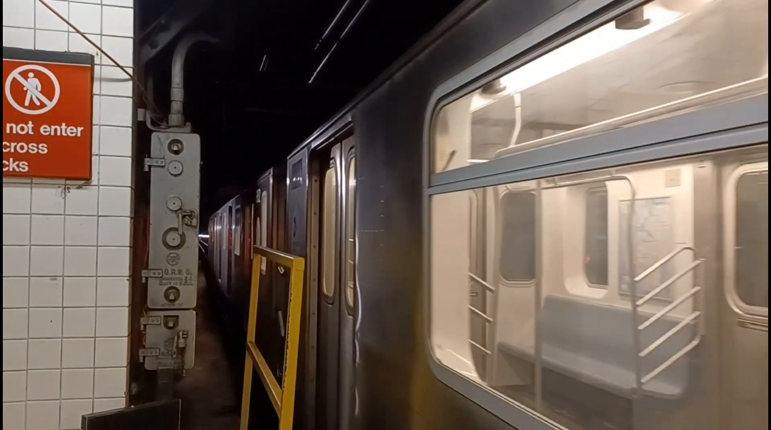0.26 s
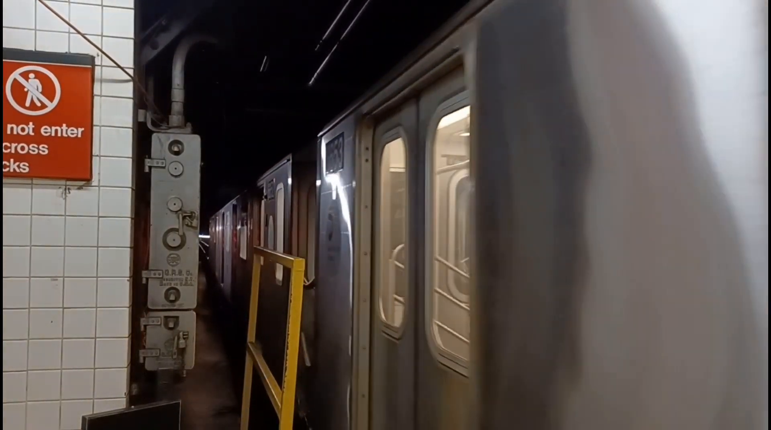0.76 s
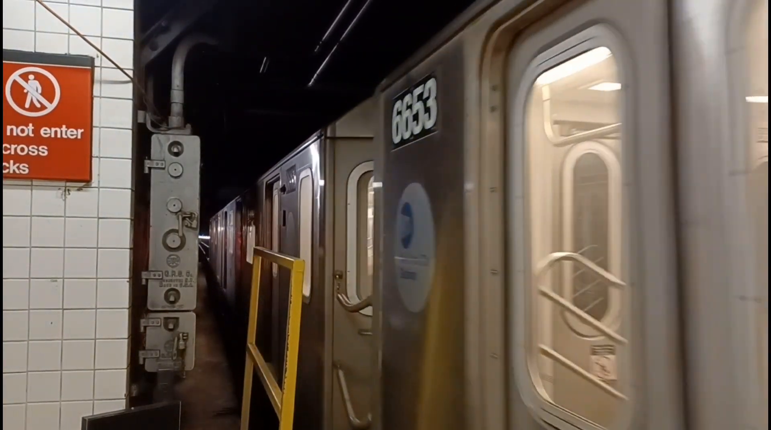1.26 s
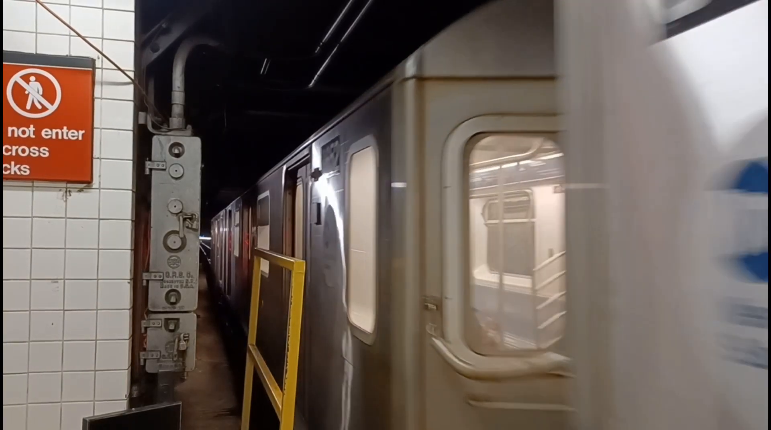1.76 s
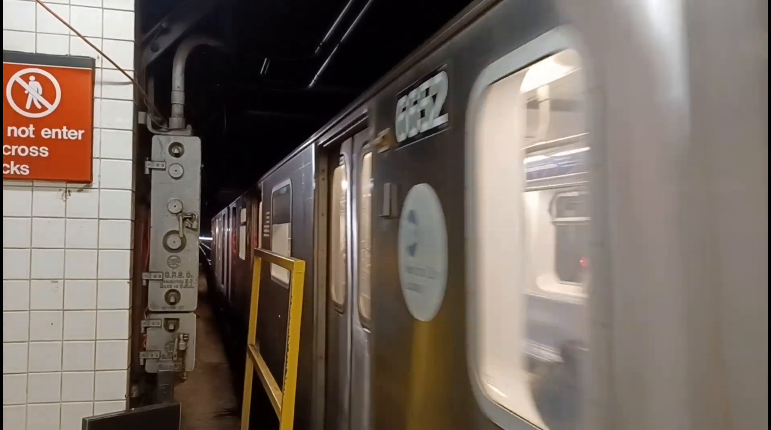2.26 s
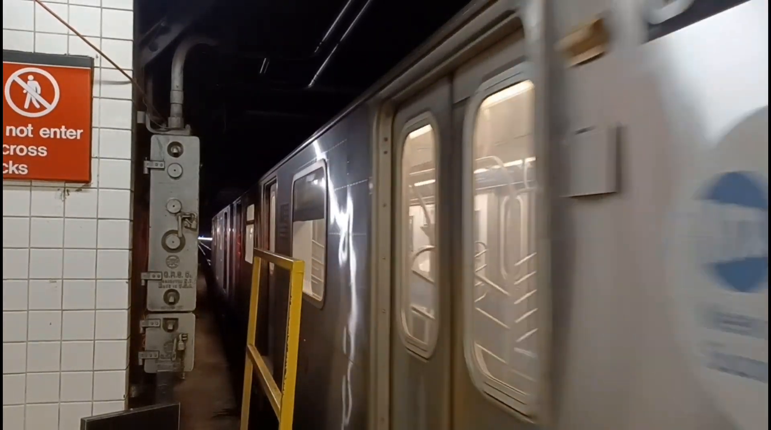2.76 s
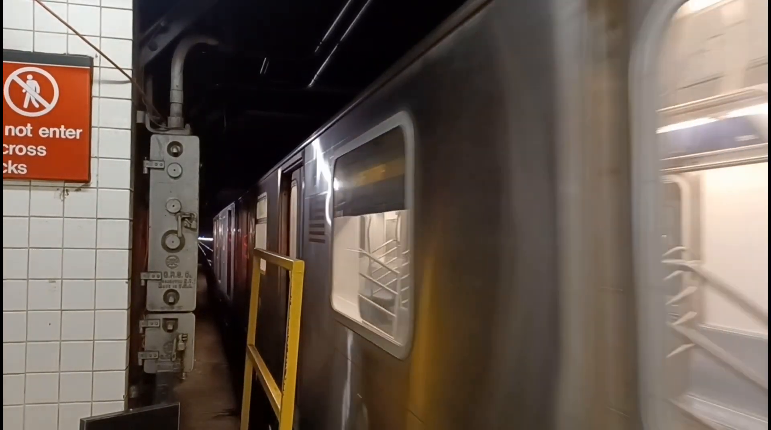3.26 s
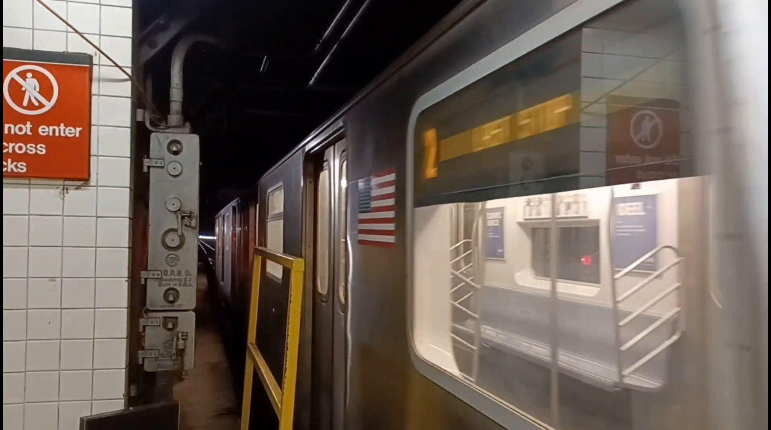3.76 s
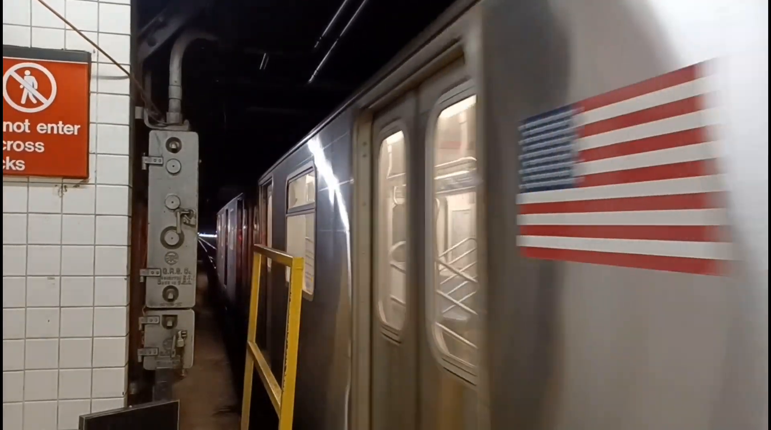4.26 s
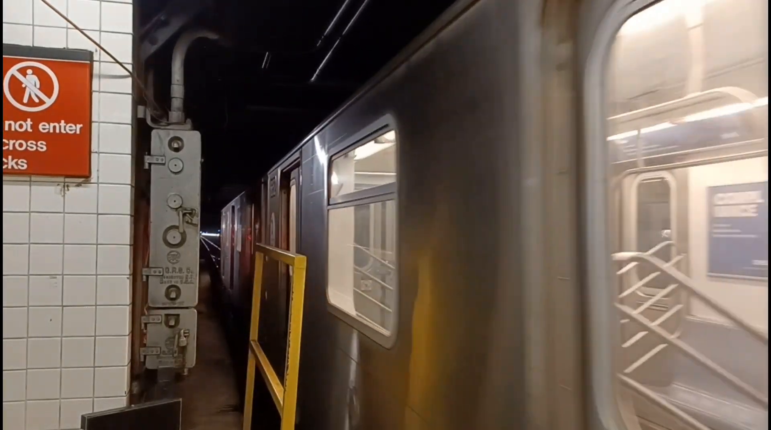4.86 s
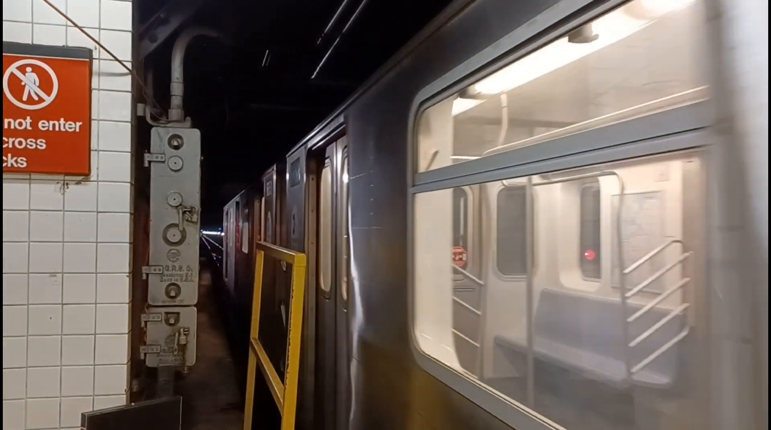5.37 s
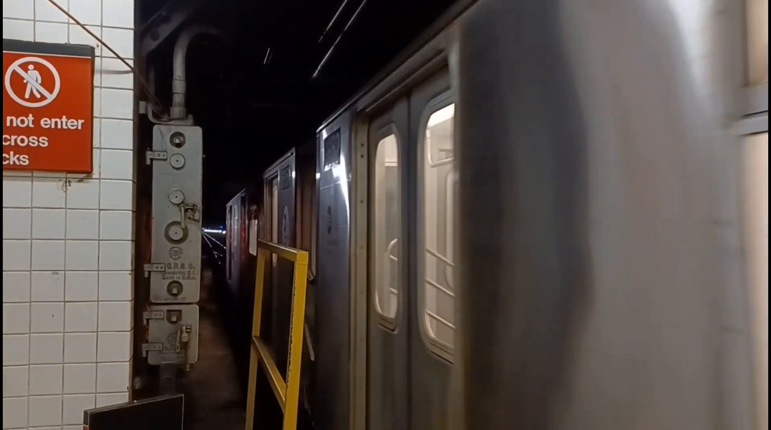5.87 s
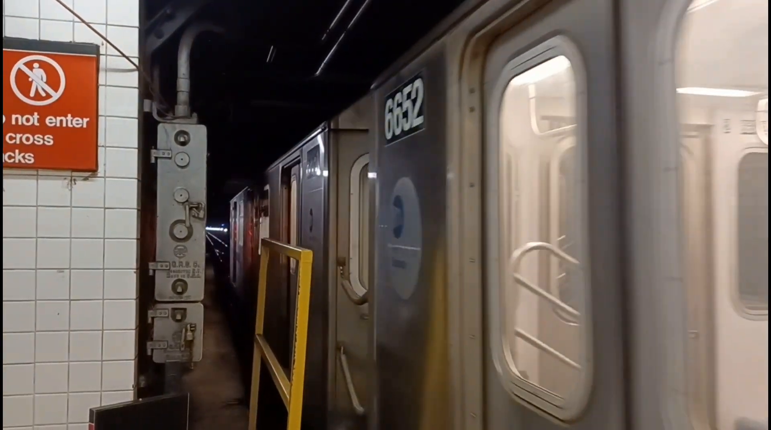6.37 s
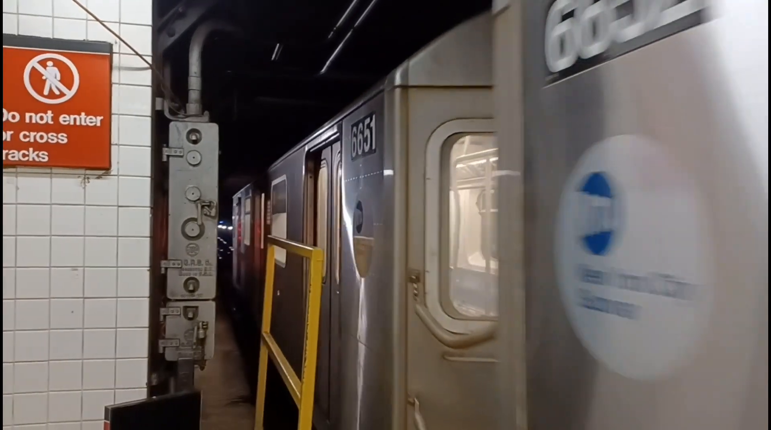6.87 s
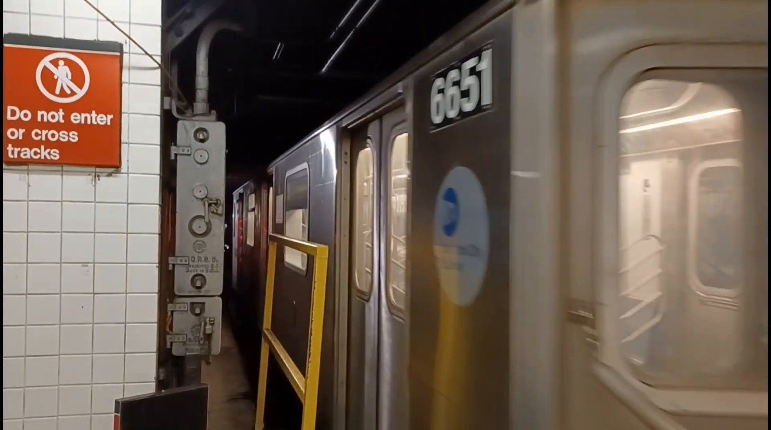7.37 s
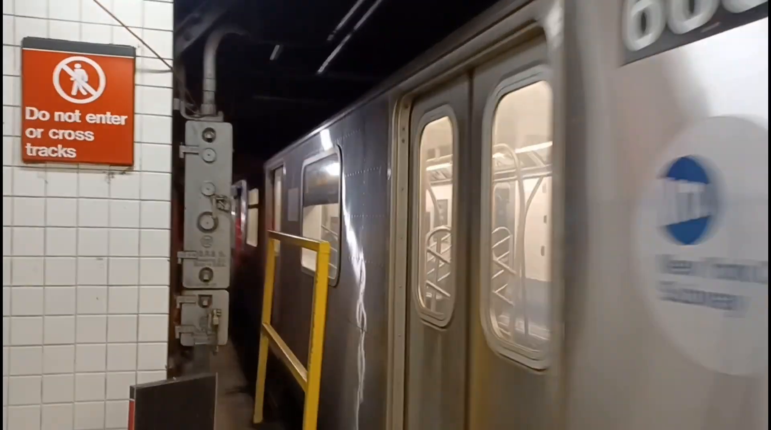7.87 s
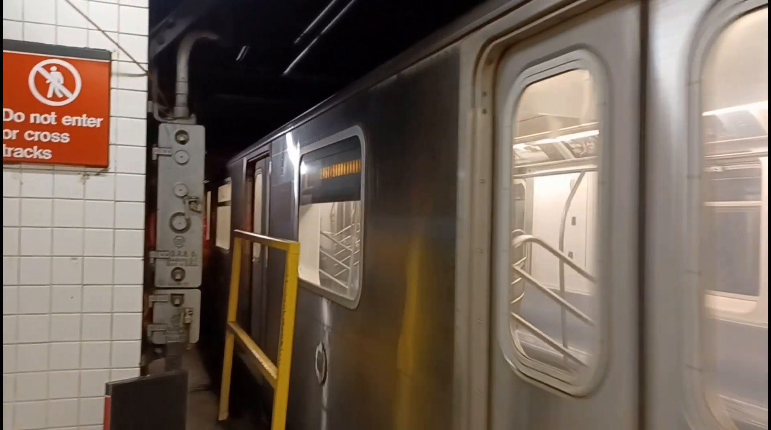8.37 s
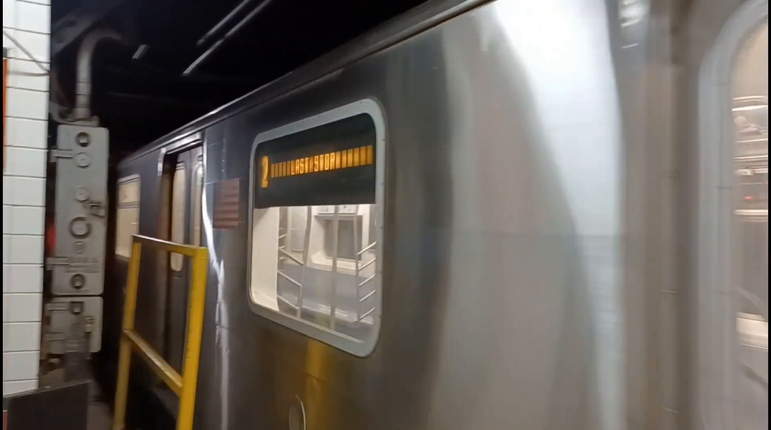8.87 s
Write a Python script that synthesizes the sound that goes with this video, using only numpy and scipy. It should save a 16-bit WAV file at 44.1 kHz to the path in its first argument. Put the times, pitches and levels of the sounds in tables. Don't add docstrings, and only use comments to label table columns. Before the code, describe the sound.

Close on an underground platform, a subway train passes at a slow steady pace. Hollow wheel knocks over rail joints come irregularly, sometimes doubled, each echoing for about a second. Under them run a rolling roar and low motor hum with a wavering gear whine. A high flange squeal sings at first, dies after two seconds, then only faint squeaks return. Thin air hiss throughout; wide stereo.

```python
import sys
import numpy as np
from scipy import signal
from scipy.fft import rfft, irfft, next_fast_len
from scipy.io import wavfile
from scipy.ndimage import uniform_filter1d

SR = 44100
rng = np.random.default_rng(int(sys.argv[2]) if len(sys.argv) > 2 else 0)


def int16_out(signal):
    q = np.round(np.clip(np.atleast_2d(signal).T, -1, 1) * 32767)
    wavfile.write(sys.argv[1], SR, q.astype(np.int16))


def volts(x):
    e = np.asarray(x, float) / 20
    return 10 ** e


N = 402633
HZ = np.fft.rfftfreq(next_fast_len(N + 8192, True), 1 / SR)

# t/s, level/dB, tilt/(dB per octave), tail factor/1, build-up/s
JOINTS = [(.002, -16, -3.5, 0.98, 0.0013), (0.854, -12, 2, 0.75, 0.0073), (1.08, -28, -5, 0.85, .03),
          (1.561, -13, 1.5, 0.97, 0.0088), (2.635, -20, 0.5, 0.71, 0.018), (3.32, -16, -0.5, 1., 0.022),
          (4.165, -17.5, 3, 0.63, 0.019), (4.448, -10.5, -0.5, 1.05, 0.0038), (4.83, -24, 3, 0.86, 0.032),
          (5.136, -16.5, 0, 1, 0.015), (5.19, -17, 0.5, 0.89, 0.014), (6.03, -14, -0.5, 0.92, 0.0035),
          (6.099, -20.5, 1.5, 0.58, 0.003), (6.797, -13, 0.5, 0.78, 0.0071), (6.85, -11.5, -2, 0.68, 0.016),
          (8.158, -25.5, 3.5, 1.23, 0.021), (9.1, -21, -0.5, 1., .01)]
# t/s, level/dB
AIR = [(0, -35.5), (.025, -45), (.8, -44.5), (1.6, -45), (2.3, -44.5), (2.75, -47.5), (3.28, -42.5),
       (4.4, -44), (5.2, -46), (6, -45.5), (7, -44.5), (8.1, -46), (8.57, -41.5), (9.13, -42)]


def evened(x):
    return x / np.sqrt(np.mean(x ** 2) + 1e-20)


def read(points, hz):
    f, value = np.transpose(points)
    return np.interp(np.log(hz + 1), np.log(f + 1), value)


def follow(rows, t):
    s, *columns = np.transpose(rows)
    return [np.interp(t, s, column) for column in columns]


def play(rows):
    return follow(rows, np.arange(rows[0][0], rows[-1][0], 1 / SR))


def bumps(rows, t):
    return sum(db * np.exp(-((t - s) / length) ** 2) for s, db, length in rows)


def add(mix, s, sound):
    part = mix[:, round(s * SR):][:, :sound.shape[1]]
    part += sound[:, :part.shape[1]]


def unit_band(db, lo_hz, hi_hz, hz):
    band = db[(hz > lo_hz) & (hz < hi_hz)]
    return db - 10 * np.log10(np.sum(volts(band) ** 2) / len(hz))


def field(level_db, size, patchy_db):
    a, b, c, d, patches = rng.standard_normal((5,) + level_db.shape)
    patches = uniform_filter1d(patches, size=30, axis=0)
    patches = evened(uniform_filter1d(patches, size=size // 256 + 1, axis=1))
    z = np.array([a + 1j * b, c + 1j * d]) * volts(level_db + patchy_db * patches)
    x = signal.istft(z.transpose(0, 2, 1), nperseg=size, noverlap=size * 3 // 4)[1][:, :N]
    return x * np.sqrt(3 / size)


def whistle(hz, db, width, steady):
    r = np.exp(-np.pi * width / SR)
    shape = (2, len(db) + 4000)
    slow = rng.standard_normal(shape) + 1j * rng.standard_normal(shape)
    slow = signal.lfilter([1], [1, -2 * r, r * r], slow)[:, 4000:]
    slow = slow / abs(slow) ** np.clip(steady, 0, 1)
    phase = 2 * np.pi * np.cumsum(hz * np.ones(len(db))) / SR
    return volts(db) * evened((slow * np.exp(1j * phase)).real)


def ducking(t):
    from_db, share, recover_s = -19.5, 0.48, 1
    s, db = np.transpose(JOINTS)[:2, :, None]
    drop_db = share * np.maximum(db - from_db, 0)
    return -np.max(drop_db * (t > s) * np.exp(-abs(t - s) / recover_s), axis=0)


def spaced_pair(x, colour=1.):
    # f/Hz, coherence/1
    likeness = [(60, 1), (300, 0.94), (450, 0.76), (600, 0.34), (780, 0.63), (1000, 0.2), (1200, 0)]
    # f/Hz, level/dB
    balance = [(60, -1.0), (130, -1.0), (290, 0.0), (640, 0.0), (1400, -1.3), (2500, -3.0), (6770, 0.0),
               (14900, 2.0)]
    one, other = rfft(x, 2 * len(HZ) - 2) * colour
    turn = 2 * np.pi * HZ * .00062 - 3.3
    along = .15 * np.exp(-1j * turn) + .06 * np.exp(1j * turn)
    along = along * np.clip(HZ / 1300, 0, 1) ** 4 * volts(-HZ / 900)
    same = np.clip(read(likeness, HZ), 0, .995) * (1 - abs(along)) + along
    right = same * one + np.sqrt(np.maximum(1 - abs(same) ** 2, 0)) * other
    lean = volts(read(balance, HZ) / 2)
    return irfft(np.array([one * lean, right / lean]))[:, :N]


def joints():
    # f/Hz, density/(dB per Hz)
    knock = [(70, -38), (120, -37), (180, -16), (300, -3.5), (530, -12), (930, -16), (1380, -27.5),
             (2000, -26.5), (3000, -34.5), (5000, -40.5), (7500, -59), (12000, -100)]
    # f/Hz, t60/s
    tunnel = [(150, 1), (350, 1), (900, 0.97), (2000, 0.95), (5000, 0.44)]
    hz, t = np.fft.rfftfreq(256, 1 / SR), np.arange(N // 64 + 5) * 64 / SR
    power = np.full((len(t), len(hz)), 1e-14)
    for s, db, tilt_db, tail, rise in JOINTS:
        age = t[(t >= s) & (t < s + 1)][:, None] - s
        colour_db = tilt_db * np.log2((hz + 50) / 400)
        decay_db = 60 * age / (tail * read(tunnel, hz + 50))
        shape = (1 - np.exp(-age / rise)) * volts(db + colour_db - decay_db)
        first = np.searchsorted(t, s)
        power[first:first + len(age)] += shape ** 2
    colour = volts(unit_band(read(knock, HZ), 150, 1500, HZ))
    return spaced_pair(field(10 * np.log10(power), size=256, patchy_db=1.42), colour)


def rings():
    # t/s, f/Hz, level/dB
    body_rings = [(.002, 285, -16), (4.17, 274.6, -22), (5.16, 206, -17), (.87, 263.6, -9.5),
                  (.856, 738, -17), (1.565, 309, -19.5), (3.326, 461, -23.5), (4.453, 281.6, -18),
                  (4.454, 484, -22), (5.146, 285.5, -11.5), (5.19, 1590, -30), (5.215, 309, -14.5),
                  (6.033, 754, -20.5), (6.035, 273, -16), (6.07, 275, -14), (6.803, 930, -23),
                  (6.81, 337, -17.5), (6.82, 206, -19), (8.165, 289.5, -20.5)]
    # f/Hz, level/dB, t60/s, blur/Hz
    tread_modes = [(1868, 0, .8, 22), (3230, -10, .6, 40), (4980, -14, .44, 55)]
    # f/Hz, level/dB, t60/s, blur/Hz
    flange_modes = [(2480, 0, .5, 45), (4180, -9, .42, 80)]
    # t/s, tread level/dB, flange level/dB
    wheel_hits = [
        (.858, -25, -32),
        (1.57, -33, -38),
        (3.33, -40, -50),
        (4.455, -32, -38),
        (5.19, -42, -40),
        (6.035, -40, -30.5),
        (6.807, -35, -32),
    ]
    body_t60_s = 0.44
    struck = [(s, hz, db, body_t60_s, 22 + 0.039 * hz) for s, hz, db in body_rings]
    for s, tread_db, flange_db in wheel_hits:
        struck += [(s, hz, tread_db + db, t60, width) for hz, db, t60, width in tread_modes]
        struck += [(s, hz, flange_db + db, t60, width) for hz, db, t60, width in flange_modes]
    out, age = np.zeros((2, N)), np.arange(SR // 2) / SR
    for s, hz, db, t60, width in struck:
        rise = 1 - np.exp(-age * hz / 1.1)
        add(out, s, rise * whistle(hz, db - 60 * age / t60, width, steady=.8))
    return out


def rolling():
    # t/s, level/dB
    roll = [(0.0, -21), (0.25, -29.5), (0.86, -27), (1.04, -21.5), (1.25, -24.5), (2.54, -29), (3.36, -23),
            (4.22, -26), (4.52, -24), (4.75, -27.5), (6.58, -29.5), (6.99, -24.5), (7.37, -27),
            (7.98, -29.5), (8.26, -28), (9.13, -26)]
    # f/Hz, density/(dB per Hz)
    roar = [(15, -88), (30, -64), (55, -27.5), (85, -16.5), (125, -13.5), (200, -10.5), (290, -9.5),
            (480, -20), (990, -25), (1350, -29), (2900, -29.5), (5200, -36.5), (7500, -60), (10000, -55)]
    zones_hz = [75, 280, 800, 3500]
    # f/Hz, width/Hz, level/dB
    wheel_modes = [
        (3260, 145, 4),
        (4150, 120, 1),
        (5020, 230, 2.5),
    ]
    # t/s, lift/dB, length/s
    thuds = [(.28, -6, .1), (0.762, -1, 0.074), (1.16, 14.5, 0.12), (1.6, 5.5, 0.17), (2.71, 10.5, 0.11),
             (3.15, 3.5, 0.16), (4.06, 2, 0.088), (4.47, 10.5, 0.12), (6.847, 2, .1), (7.195, 1, 0.044),
             (7.7, -2, 0.33), (2.95, 3, 0.11), (8.389, 5, .07), (8.77, 5, 0.15)]
    # t/s, lift/dB, length/s
    scrapes = [
        (.6, 1.5, 0.24),
        (3.36, .6, .08),
        (5.25, -1.5, .08),
        (6.75, 1, .1),
        (8.3, 4, 0.11),
    ]
    force_share = [0.61, 0.95, 1.03, 0.1]
    draught_share = [0.05, 0.05, 0.16, 0.66]
    thud_share = [0.97, 0.15, .05, .01]
    hz, t = np.fft.rfftfreq(1024, 1 / SR), np.arange(N // 256 + 5) * 256 / SR
    force = follow(roll, t)[0]
    draught = follow(AIR, t)[0] + ducking(t)
    zones = np.outer(force_share, force - np.median(force))
    zones += np.outer(thud_share, bumps(thuds, t))
    zones += np.outer(draught_share, draught - np.median(draught))
    zones[3] += bumps(scrapes, t)
    place = np.interp(np.log(hz + 1), np.log(zones_hz), np.arange(4))
    share = np.maximum(1 - abs(place - np.arange(4)[:, None]), 0)
    colour_db = unit_band(read(roar, HZ), 450, 1300., HZ) - 35.5
    for mode_hz, width, db in wheel_modes:
        colour_db += db / (1 + ((HZ - mode_hz) / width * 2) ** 2)
    return spaced_pair(field(zones.T @ share, size=1024, patchy_db=1.63), volts(colour_db))


def squeal(out):
    # t/s, level/dB
    loudness = [(0, -34.5), (.4, -32), (.6, -34), (1.05, -33), (1.2, -37), (1.72, -31.5), (1.85, -36.5),
                (2.05, -42), (2.3, -59)]
    # f/Hz, level/dB, blur/Hz
    partials = [
        (2568, .5, 70),
        (3860, -21, 70),
        (5150, -15, 60),
    ]
    for hz, rel_db, width in partials:
        add(out, 0, whistle(hz, play(loudness)[0] + rel_db, width, steady=.45))


def squeaks(out):
    # start t/s, length/s, f/Hz, glide/Hz, level/dB
    slips = [
        (2.05, 0.23, 1710, -30, -41),
        (2.3, .45, 3300, 20, -45),
        (2.35, 0.31, 2960, -19, -44),
        (3.2, .2, 3740, 10, -44),
        (3.2, .22, 1190, 80, -37),
        (6.45, .4, 2830, 170, -42),
    ]
    for s, length, hz, glide_hz, db in slips:
        part = np.arange(0, 1, 1 / (length * SR))
        swell = np.sqrt(np.sin(np.pi * part))
        add(out, s, swell * whistle(hz + glide_hz * part, np.full(len(part), db), width=70, steady=.3))


def brake_whistle(out):
    # t/s, f/Hz, level/dB
    brake = [(1.721, 1228, -55), (1.8, 1192, -40), (1.9, 1246, -39), (2, 1208, -38), (2.08, 1200, -55)]
    add(out, brake[0][0], whistle(*play(brake), width=14, steady=0.56))


def motor_hum(out):
    # t/s, level/dB
    hum = [(0, -38), (.4, -36.5), (.85, -29), (1.45, -29), (1.8, -38), (2.3, -34), (3, -35), (3.3, -27),
           (4.2, -24), (4.6, -30.5), (5.3, -35), (6, -38.5), (6.4, -32), (7, -28), (7.6, -26.5),
           (8.3, -32.5), (9.13, -29)]
    # t/s, lift/dB, length/s
    in_step = [(.05, 4, .04), (.71, 4, .05), (1.43, 5, .06), (2.72, 8, 0.096), (3.71, 4, 0.043),
               (5, 10, .07), (5.62, 8, .04), (5.73, 9, 0.041), (6.28, 10, .04), (6.64, 4, .04),
               (7.22, -3, .06), (7.4, 3, 0.043), (7.73, -9, 0.054)]
    db = play(hum)[0] + bumps(in_step, np.arange(0, hum[-1][0], 1 / SR))
    add(out, 0, whistle(121.8, db, width=11, steady=.75))


def gear_whine(out):
    # t/s, f/Hz, level/dB
    gears = [(0, 1806, -39.5), (.7, 1770, -48), (1.6, 1800, -48), (1.95, 1760, -43), (2.17, 1700, -43),
             (2.4, 1660, -42.5), (2.7, 1638, -45), (3.1, 1670, -56), (4.3, 1700, -49), (5.1, 1712, -46),
             (5.9, 1696, -41), (6.55, 1639, -45), (7.1, 1716, -39), (7.8, 1650, -50), (8.6, 1678, -39.5),
             (9.13, 1666, -48)]
    mesh_hz, mesh_db = play(gears)
    lower = whistle(mesh_hz, mesh_db, width=160, steady=0)
    upper = whistle(mesh_hz * 1.76, mesh_db - 3.5, width=110, steady=0)
    add(out, 0, lower + upper)


def drones(out):
    # t/s, f/Hz, level/dB
    lines = [
        [(2.9, 286, -33.5), (3.1, 288.4, -29.5), (3.5, 287, -30), (3.8, 282, -28), (4, 281.6, -21.5),
         (4.15, 281, -33)],
        [(3, 199, -57), (3.2, 200.7, -27.5), (3.6, 193.3, -37), (3.9, 197.4, -42), (4.1, 207, -49)],
        [(1.7, 287.7, -33), (2, 290.5, -37), (2.3, 290.7, -28.5), (2.45, 292, -49)],
        [(8.2, 223.4, -34), (8.6, 222.4, -33.5), (9.13, 223.5, -37)],
        [(7.2, 10050, -70), (7.4, 10100, -60), (8.05, 10100, -59), (8.2, 10090, -70)],
    ]
    for rows in lines:
        add(out, rows[0][0], whistle(*play(rows), width=24, steady=.5))


def tones():
    out = np.zeros((2, N))
    for source in (squeal, squeaks, motor_hum, gear_whine, drones, brake_whistle):
        source(out)
    return out


def air():
    # f/Hz, density/(dB per Hz)
    air_colour = [(3820, -10.5), (6500, -4), (7530, -14.5), (9960, -6.5), (12200, -1.5), (13500, -3),
                  (15300, -8.5)]
    t = np.arange(0, N + 256, 256) / SR
    level_db = follow(AIR, t)[0] + ducking(t) + .55 * rng.standard_normal(len(t))
    level = volts(np.interp(np.arange(N) / SR, t, level_db))
    colour = volts(unit_band(read(air_colour, HZ), 8500., 15000., HZ))
    return spaced_pair(level * rng.standard_normal((2, N)), colour)


def scene():
    return joints() + rolling() + spaced_pair(rings() + tones()) + air()


def top_cut(x):
    return signal.sosfilt(signal.butter(12, 15480, fs=SR, output="sos"), x)


def record(dry):
    trimmed = signal.lfilter(*signal.butter(2, 38, "highpass", fs=SR), dry)
    return top_cut(np.clip(trimmed, -1, 1))


dry = scene()
out = record(dry)
int16_out(out)
```